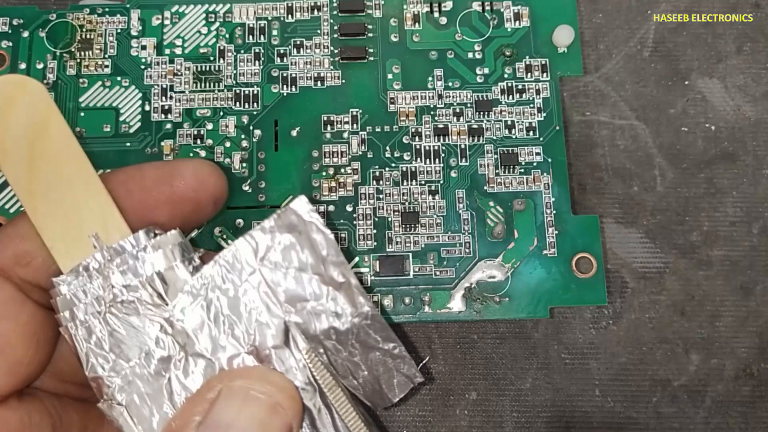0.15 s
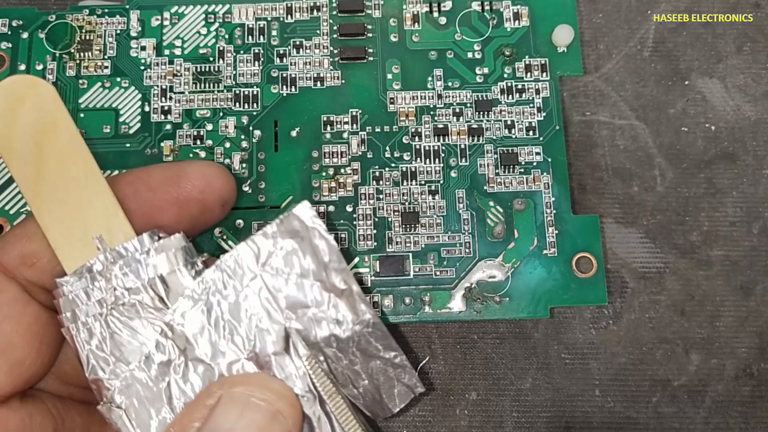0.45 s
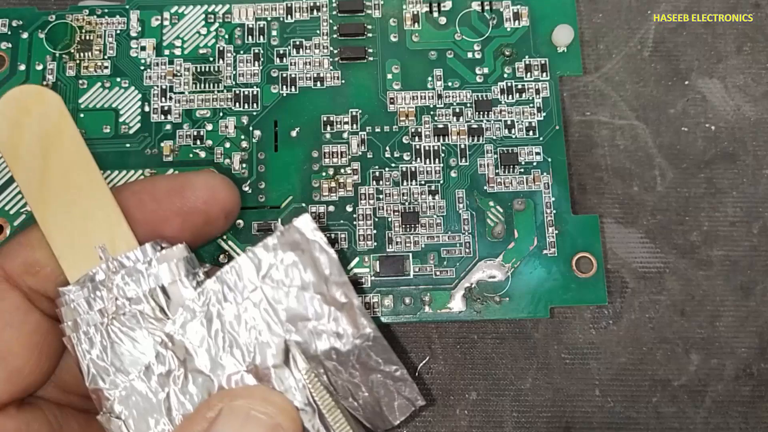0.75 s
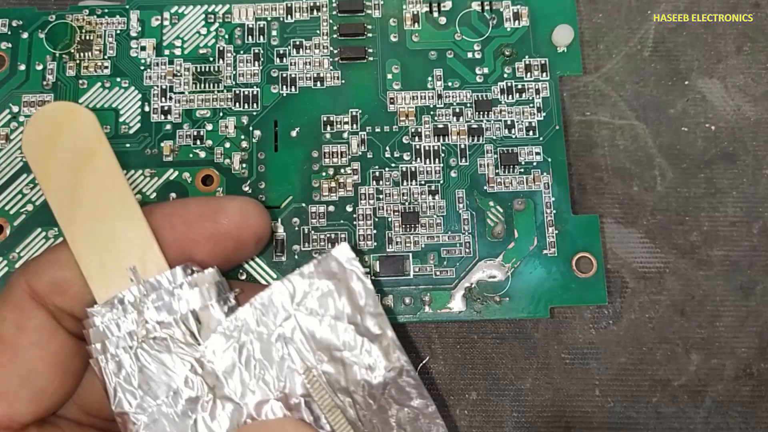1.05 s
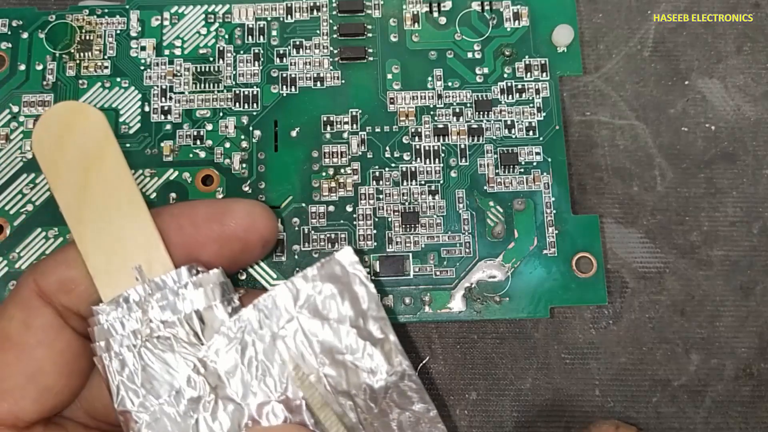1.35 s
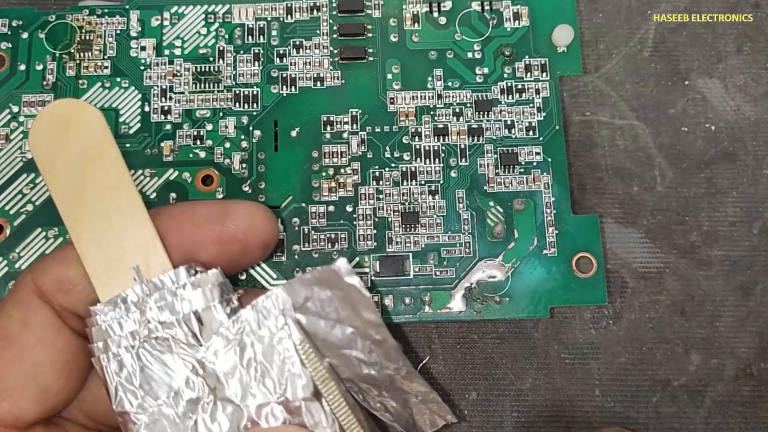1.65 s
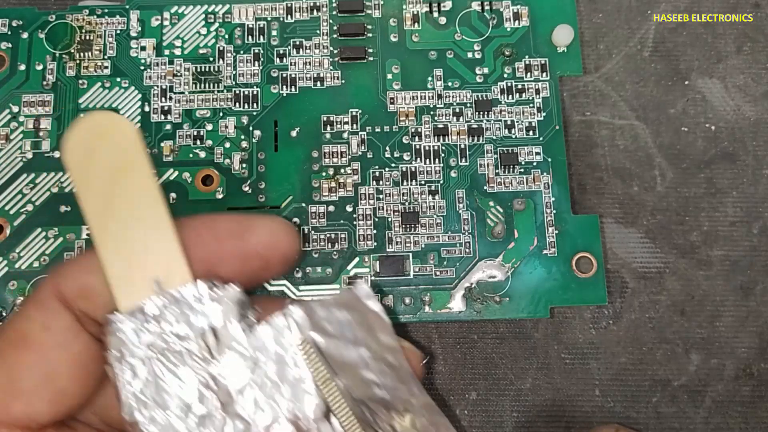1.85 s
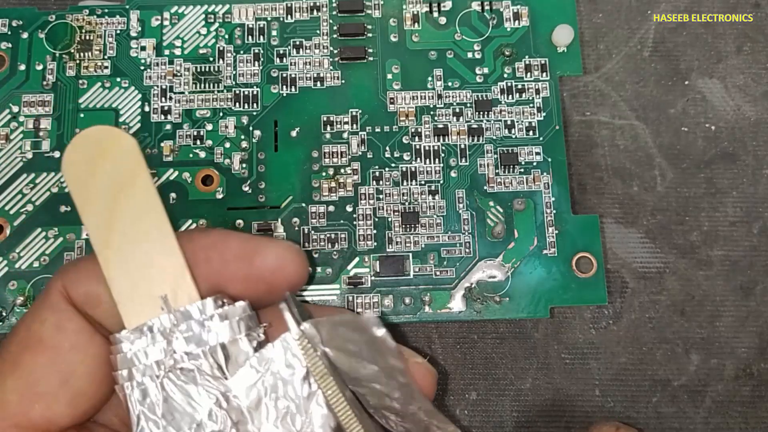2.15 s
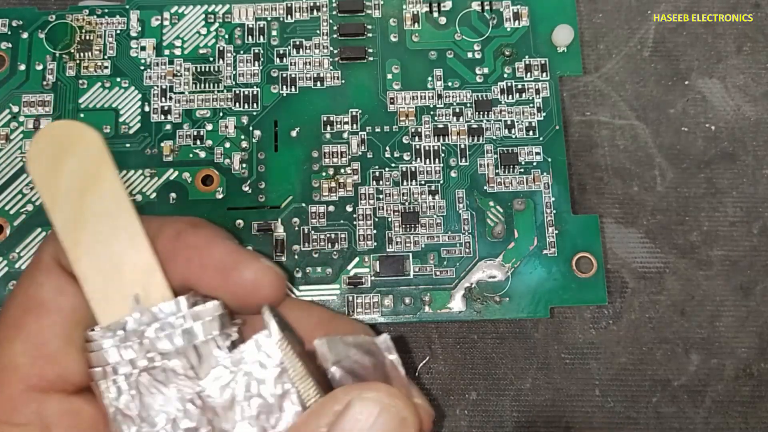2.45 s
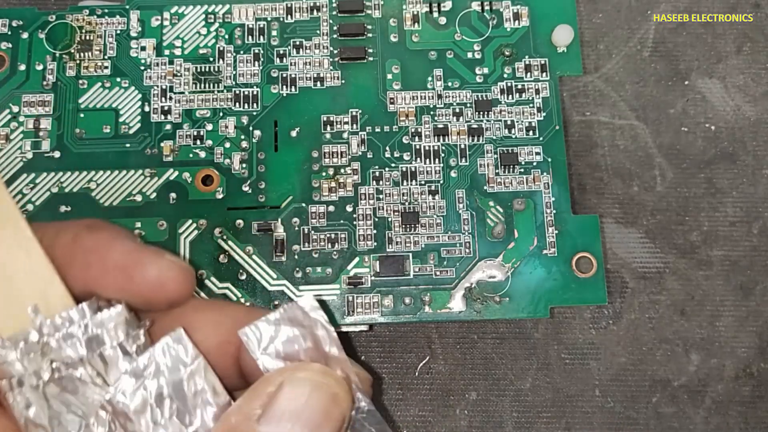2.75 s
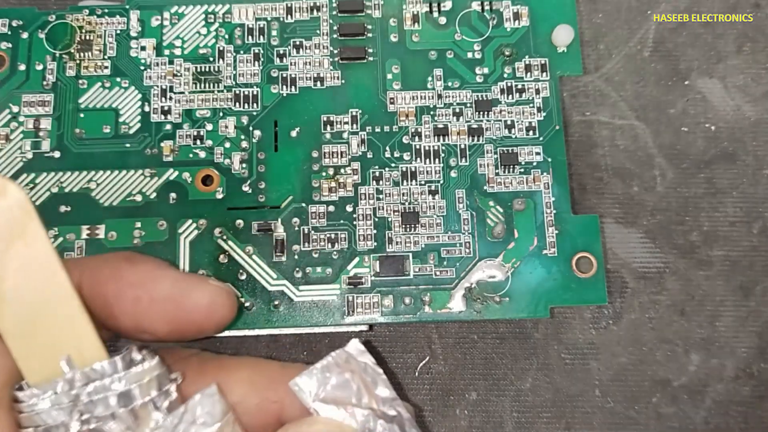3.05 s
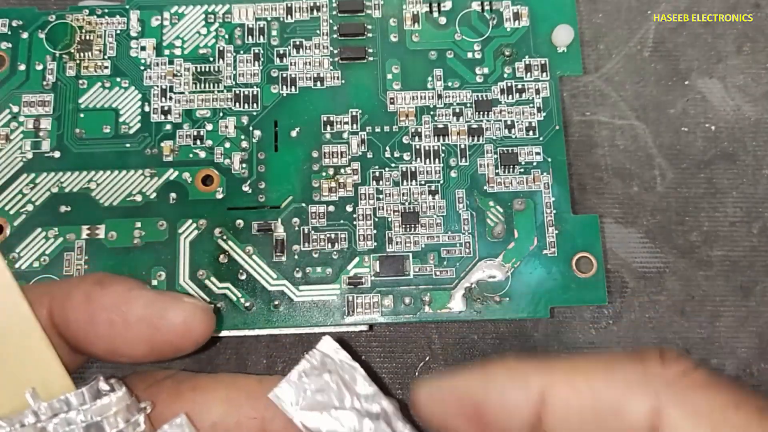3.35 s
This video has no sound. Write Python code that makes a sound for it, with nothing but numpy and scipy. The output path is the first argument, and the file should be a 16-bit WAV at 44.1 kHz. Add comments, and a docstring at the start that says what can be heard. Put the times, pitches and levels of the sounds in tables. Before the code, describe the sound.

Foil is crumpled close by with sharp irregular crackles, a bench thump and a brief metallic clatter.

```python
"""Workbench in a small, faintly humming room: aluminium foil tape is worked by hand with a small steel tool, close by.
Snaps are noise bursts with an after-ring, rustles are showers of tiny slips, loose flaps ring at wavering pitches.
The tool scrapes out of the foil, something bumps the bench and the tool clatters down: bursts plus damped modes.
Fingers then press the tape: a few more snaps, and band noise as one smooths it. A diffuse noise tail is the room."""
import sys
import numpy as np
from scipy import signal
from scipy.fft import rfft, irfft, next_fast_len
from scipy.io import wavfile
from scipy.ndimage import uniform_filter1d, map_coordinates

SR = 44100
rng = np.random.default_rng(int(sys.argv[2]) if len(sys.argv) > 2 else 0)


def put_to_file(sound):
    """Save the sound as 16-bit audio at rate SR, in the file named by the first command-line argument."""
    columns = np.atleast_2d(sound).T  # one column per channel
    safe = np.clip(columns, -1, 1)
    whole_steps = np.round(safe * 32767)
    wavfile.write(sys.argv[1], SR, whole_steps.astype(np.int16))


N = 154350

# left-right likeness of the diffuse sound: (frequency [Hz], likeness [0-1])
AIR_LIKENESS = [(100, 0.89), (400, 0.64), (1500, 0.037), (8000, 0.048)]
# bench top modes: (frequency [Hz], level [dB], t60 [s])
BENCH_MODES = [(127, -10, 0.19), (164.4, -5, 0.27), (231, -5, 0.08), (265, -4, 0.2), (298, -4.5, 0.17),
               (362, 2, .26), (400, 1, 0.17), (419, 0, 0.17), (477, -4.5, 0.15), (521, -9, 0.2),
               (658, -13, 0.24), (815, -11, .2)]
# foil spectrum: (frequency [Hz], level [dB])
FOIL_SPECTRUM = [(60, -50), (200, -10.5), (450, -7), (1000, 2.5), (1450, -0.5), (2000, -3), (3000, -1),
                 (4300, 0.5), (5700, -3), (7300, 6), (9000, -1.5), (10500, -3.5), (15000, 2.5)]

FOIL_LAG_S, BENCH_LAG_S = 0.00009, 0.00037  # left ear of the recorder lags
FOIL_SPREAD, BENCH_PAN_DB = 0.68, -4  # pan: left over right
BENCH_DB = -16  # bench ring re the blow
SPIKE_DB = -5.5  # first jolt of a crack re the burst that follows


def amp(db):
    """Decibels to gain."""
    return 10 ** (np.asarray(db) / 20)


def unit(x):
    """Scale to rms 1."""
    return x / np.sqrt(np.mean(x ** 2) + 1e-20)


def along(points, hz):
    """Interpolate (Hz, value) points on a log frequency axis."""
    f, v = np.transpose(points)
    return np.interp(np.log(hz + 1), np.log(f), v)


def fade(t, t60):
    """Exponential decay, 60 dB in t60 seconds."""
    return np.exp(-np.log(1000) * t / max(t60, 1e-4))


def wander(knots, position):
    """Smooth random curve through the knots, one knot per unit of position."""
    return map_coordinates(knots, [position], mode="mirror")


def pan_gain(pan_db):
    """Left and right gains for a left-over-right level difference."""
    return amp([[pan_db / 2], [-pan_db / 2]])


def add(out, s, x):
    """Mix x in at time s."""
    i = max(round(s * SR), 0)
    out[:, i:i + x.shape[-1]] += x[..., :max(N - i, 0)]


def tone(base, body_db, clang_db, air_db):
    """A material's spectrum, tilted for one contact."""
    tilt = [(1000, body_db), (2500, clang_db), (5500, 0), (8000, 0), (12000, air_db)]
    return lambda hz: along(base, hz) + along(tilt, hz)


def radiate(pair, colour, lag_s, pan_db, spread, size=8192):
    """Two excitations become a stereo sound with a causal colour, the left side lagging."""
    m = next_fast_len(pair.shape[1] // 2 + size // 2) * 2
    hz = np.fft.rfftfreq(m, 1 / SR)
    z = rfft(pair, m)
    smooth_power = np.abs(uniform_filter1d(np.abs(z) ** 2, len(hz) // 20, axis=1)) + 1e-12
    # minimum phase: fold the cepstrum of the wanted gain onto positive time
    cepstrum = irfft(np.log(amp(colour(hz)) / np.sqrt(smooth_power)), m)
    cepstrum[:, 1:m // 2] *= 2
    cepstrum[:, m // 2 + 1:] = 0
    a, b = z * np.exp(rfft(cepstrum))
    side = spread * b * hz / (hz + 250)  # the bass reaches both sides alike
    ears = np.array([a + side, a - side])
    ears[0] *= np.exp(-2j * np.pi * hz * lag_s)
    return irfft(ears, m) * pan_gain(pan_db)


def crack(colour, t60, lag_s, pan_db, spread, ring_db, spike_db):
    """A jolt, a sharp burst and a short dense after-ring, rms 1 over the blow."""
    attack_s, sheet_t60_s, blow_s = 0.00026, 0.087, 0.004
    t = np.arange(SR // 8) / SR
    decay = fade(t, t60) + amp(ring_db) * fade(t, sheet_t60_s)
    x = rng.standard_normal((2, len(t))) * decay * (1 - np.exp(-t / attack_s))
    x[0, round(attack_s * SR)] += amp(spike_db) * np.linalg.norm(x[0])
    x = radiate(x, colour, lag_s, pan_db, spread)
    return x / np.sqrt(np.mean(x[:, :round(blow_s * SR)] ** 2))


def ring(modes, lag_s, pan_db):
    """Damped modes of alternating sign, each struck a little harder or softer every time."""
    t = np.maximum(np.arange(SR // 2) / SR - np.array([[lag_s], [0]]), 0)
    x = np.zeros_like(t)
    for k, (hz, db, t60) in enumerate(modes):
        strength = (-1) ** k * amp(db + rng.normal())
        x += strength * fade(t, t60) * np.sin(2 * np.pi * hz * t)
    return x * pan_gain(pan_db)


def room_noise():
    """Steady low rush plus hum partials whose phases drift."""
    # rush spectrum: (frequency [Hz], relative level [dB])
    rush_spectrum = [(25, -11), (45, 0), (65, -6), (140, -1), (250, -1), (370, -4), (470, -9), (800, -7.5),
                     (1300, -14), (2000, -18), (3500, -22.5), (5500, -26.5), (7400, -25), (10000, -31),
                     (15500, -27.5)]
    # hum partials: (frequency [Hz], level [dB])
    hum_partials = [(66, -61), (97, -61), (143, -61.5), (197, -69)]
    rush_db, drift_rad, drift_per_s = -51.5, 0.73, 10
    hz, t = np.fft.rfftfreq(N, 1 / SR), np.arange(N) / SR
    turn = np.arccos(np.clip(along(AIR_LIKENESS, hz), -1, 1)) / 2
    noise = rfft(rng.standard_normal((2, N))) * amp(along(rush_spectrum, hz))
    mid, side = irfft(noise * [np.cos(turn), np.sin(turn)], N)
    rush = amp(rush_db) * unit(np.array([mid + side, mid - side]))
    hum = np.zeros(N)
    for f, db in hum_partials:
        drift = drift_rad * wander(rng.standard_normal(64), t * drift_per_s)
        hum += amp(db) * np.sqrt(2) * np.sin(2 * np.pi * f * t + drift)
    return (rush + hum) * pan_gain(-1.8)


def room(x):
    """A short diffuse tail of decaying noise, most alike on both sides in the bass."""
    # reverberation: (frequency [Hz], t60 [s])
    room_t60 = [(150, 0.45), (1000, 0.5), (4000, 0.57), (8000, 0.51), (15000, 0.45)]
    # tail spectrum: (frequency [Hz], level [dB])
    room_colour = [(150, -10), (1000, -9.5), (3000, -9), (7500, -11), (15000, -14)]
    build_up_s = 0.0042
    hz, t, z = signal.stft(rng.standard_normal((2, SR)), SR, nperseg=256)
    alike = np.clip(along(AIR_LIKENESS, hz), 0, 1)[:, None]
    z[1] = alike * z[0] + np.sqrt(1 - alike ** 2) * z[1]
    decay = np.exp(-np.log(1000) * t / np.maximum(along(room_t60, hz), 0.02)[:, None])
    energy_norm = np.sqrt(SR * np.mean(decay ** 2, axis=1, keepdims=True))
    gain = amp(along(room_colour, hz))[:, None] / energy_norm
    tail = signal.istft(z * decay * gain, SR, nperseg=256)[1]
    tail *= 1 - np.exp(-np.arange(tail.shape[1]) / SR / build_up_s)
    return signal.fftconvolve(x, tail, axes=1)[:, :N]


def bench_bumps():
    """Soft blows: a dull burst, and the bench top's modes ring."""
    # blows: (time [s], level [dB])
    bumps = [(1.184, -31.5), (2.468, -10.5)]
    # bump spectrum: (frequency [Hz], level [dB])
    bump_spectrum = [(25, -25), (60, -10.5), (130, -9.5), (290, 3.5), (620, -6), (1030, 6.5), (1350, -8.5),
                     (1700, -13), (2700, -10.5), (3500, -25.5), (7000, -29), (15000, -51)]
    bump_t60_s, bump_ring_db = 0.014, -5
    out = np.zeros((2, N))
    for s, db in bumps:
        thump = crack(lambda hz: along(bump_spectrum, hz), bump_t60_s, lag_s=0.0002,
                      pan_db=BENCH_PAN_DB, spread=0.58, ring_db=-22, spike_db=5)
        add(out, s, amp(db) * thump)
        add(out, s, amp(db + BENCH_DB + bump_ring_db) * ring(BENCH_MODES, BENCH_LAG_S, BENCH_PAN_DB))
    return out


def bench_knocks():
    """Hollow knocks: one damped bench mode each."""
    # knocks: (time [s], pitch [Hz], level [dB])
    thuds = [(1.185, 473, -36.5), (2.491, 205, -25), (2.571, 138, -26), (2.622, 363, -26.5)]
    thud_t60_s = 0.06
    out = np.zeros((2, N))
    for s, hz, db in thuds:
        add(out, s, amp(db) * ring([(hz, 0, thud_t60_s)], BENCH_LAG_S, BENCH_PAN_DB))
    return out


def tool_clatter():
    """The steel tool lands, rocks and bounces; each hit rings the modes of bench and tool."""
    # hits: (time [s], level [dB], body at 1 kHz [dB], clang at 2.5 kHz [dB], air at 12 kHz [dB],
    #        t60 [s], left over right [dB])
    hits = [(2.5341, -15.5, 20.3, 14, 2.5, 0.048, -1.5), (2.5699, -22, 9.9, 8.8, -29, 0.0085, -6),
            (2.5851, -11.5, 1.8, 2.5, -6.5, 0.024, 0), (2.599, -24, 9.4, 9.5, -14, .05, -4.5),
            (2.6367, -22, 12.8, 7.3, -9, 0.032, 0.5)]
    # steel spectrum: (frequency [Hz], level [dB])
    steel_spectrum = [(25, -10), (70, -8.5), (380, 5), (650, -4), (1300, 1), (2500, -6.5), (4200, -3),
                      (6000, -8), (8000, -6), (11000, -10.5), (15500, -9)]
    # tool modes: (frequency [Hz], level [dB], t60 [s])
    tool_modes = [(1192, -3, .15), (1332, -4, .28), (1447, -5, .28), (4188, -9, .15), (7490, -5, .17),
                  (8127, 0, 0.14), (11280, -4, 0.1), (11735, -5, .13)]
    tool_db = -22  # tool ring re the hit
    out = np.zeros((2, N))
    for s, db, body, clang, air, t60, pan in hits:
        colour = tone(steel_spectrum, body, clang, air)
        hit = crack(colour, t60, BENCH_LAG_S, pan, spread=0.67, ring_db=-26, spike_db=SPIKE_DB)
        add(out, s, amp(db) * hit)
        add(out, s, amp(db + BENCH_DB) * ring(BENCH_MODES, BENCH_LAG_S, BENCH_PAN_DB))
        add(out, s, amp(db + tool_db) * ring(tool_modes, BENCH_LAG_S, pan))
    return out


def smoothing():
    """A finger smooths the tape: steady friction sings softly in two resonances of the taut tape."""
    # one pass: (start [s], end [s], level [dB])
    start, end, db = (3.16, 3.5, -53.5)
    # tape resonances: (frequency [Hz], width [Hz], level [dB])
    tape_resonances = [(950, 120, -2), (1710, 300, -1.5)]
    hz, t = np.fft.rfftfreq(N, 1 / SR), np.arange(N) / SR
    body = sum(amp(level) / (1 + ((hz - f) / width * 2) ** 2) for f, width, level in tape_resonances)
    a, b = irfft(rfft(rng.standard_normal((2, N))) * body, N)
    force = np.clip(np.minimum(t - start, end - t) / 0.01, 0, 1)  # 10 ms ramps
    return amp(db) * force * unit(np.array([a + FOIL_SPREAD * b, a - FOIL_SPREAD * b]))


def foil_flaps():
    """A freed flap of foil rings briefly at one wavering pitch until the fingers damp it."""
    # flaps: (time [s], pitch [Hz], level [dB], t60 [s])
    flaps = [(.528, 1960, -20, 0.026), (.537, 929, -29.5, 0.053), (.628, 1190, -25, 0.014),
             (0.6342, 1310, -27.5, 0.02), (.675, 822, -39, 0.046), (0.876, 1290, -29.5, 0.011),
             (1.0674, 1660, -44.5, 0.052), (1.5238, 2420, -31, 0.016), (2.267, 1095, -22, 0.027),
             (2.294, 2090, -30, 0.039), (2.304, 1946, -24, 0.041), (3.147, 1932, -26.5, 0.033),
             (3.452, 1050, -36, 0.021)]
    pitch_wander, wander_per_s = 0.025, 300  # relative
    rise_over_t60 = 0.016
    out, t = np.zeros((2, N)), np.arange(SR // 8) / SR
    for s, hz, db, t60 in flaps:
        waver = pitch_wander * wander(rng.standard_normal(64), t * wander_per_s)
        phase = 2 * np.pi * hz * (np.cumsum(1 + waver) / SR - np.array([[FOIL_LAG_S], [0]]))
        envelope = (1 - np.exp(-t / (rise_over_t60 * t60))) * fade(t, t60)
        add(out, s, amp(db) * np.sqrt(2) * envelope * np.sin(phase))
    return out


def shifting(x):
    """The sheet's resonances come and go as it bends: a random gain field over frequency and time."""
    depth_db, spacing_hz, life_s = 3.5, 469, 0.0226
    hz, t, z = signal.stft(x, SR, nperseg=256)
    grid = np.meshgrid(hz / spacing_hz, t / life_s, indexing="ij")
    field = map_coordinates(rng.standard_normal((96, 96)), grid, mode="mirror")
    return signal.istft(z * amp(depth_db * field), SR, nperseg=256)[1]


def foil_rustle():
    """Thousands of tiny slips a second excite the sheet while it is rubbed or bent."""
    # strokes: (start [s], rise [s], hold [s], fall [s], level [dB],
    #           body at 1 kHz [dB], clang at 2.5 kHz [dB], air at 12 kHz [dB])
    strokes = [(0.509, 0.013, 0.018, 0.033, -30, 5, 11, -3),
               (0.799, 0.067, 0.013, 0.054, -41.5, 12.5, 10, -8),
               (1.054, 0.014, 0.012, 0.098, -43, 3, 10.5, -10), (1.139, 0.039, 0.0085, 0.16, -42, 5, 6, -6),
               (1.513, 0.028, 0.062, 0.021, -35.5, 2, 3.5, -2.5),
               (1.875, 0.045, 0.66, 0.081, -50, 1, 7.5, -0.5),
               (2.041, 0.028, 0.0043, 0.016, -36, -3, -3, -5),
               (2.168, 0.075, 0.036, 0.017, -31.5, 2, 7.5, -5),
               (2.243, 0.019, 0.0073, 0.0053, -22, -1.5, 3, -8),
               (2.251, 0.035, 0.038, 0.01, -27, -7, 0.5, 1.5),
               (2.35, 0.079, 0.056, 0.082, -41.5, 4, 6.5, -10), (2.54, 0.054, 0.039, 0.062, -35, 9, 16, -6),
               (2.681, 0.033, 0.54, 0.33, -54, 11, 6, -11.5),
               (3.109, 0.0088, 0.15, 0.21, -47, -0.5, 5, -4.5), (3.283, 0.029, 0.1, 0.15, -43, -5, 0, -3),
               (3.446, 0.029, 0.014, 0.054, -43.5, -11, 5, -9)]
    slips_per_s, slip_spread_db = 6000, 3
    range_db, pan_db = 22, -1
    flutter_db, flutter_per_s = 2.1, 150  # the rubbing catches and lets go
    out = np.zeros((2, N))
    for s, rise, hold, fall, db, body, clang, air in strokes:
        n = round((rise + hold + fall) * SR)
        t = np.arange(n) / SR
        slip_sizes = (rng.random(n) < slips_per_s / SR) * amp(slip_spread_db * rng.standard_normal(n))
        slips = slip_sizes * rng.standard_normal((2, n))
        rubbed = radiate(slips, tone(FOIL_SPECTRUM, body, clang, air), FOIL_LAG_S, pan_db, FOIL_SPREAD)
        rubbed = unit(shifting(rubbed)[:, :n])
        force_db = np.interp(t, np.cumsum([0, rise, hold, fall]), [-range_db, 0, 0, -range_db])
        catch_db = flutter_db * wander(rng.standard_normal(256), t * flutter_per_s)
        add(out, s, amp(db + force_db + catch_db) * rubbed)
    return out


def crumpled(colour):
    """Add the chance resonances of the sheet's present shape to a spectrum."""
    depth_db, spacing_hz = 4.5, 279
    knots = rng.standard_normal(256)
    return lambda hz: colour(hz) + depth_db * wander(knots, hz / spacing_hz) * hz / (hz + 500)


def foil_snaps():
    """Each crease buckles at once and shakes the sheet."""
    # creases: (time [s], level [dB], body at 1 kHz [dB], clang at 2.5 kHz [dB], air at 12 kHz [dB],
    #           t60 [s], left over right [dB])
    creases = [(0.5222, -16, -42, -6, -1.5, 0.0032, 0.5), (0.5273, -30.5, -2, 17, -15, 0.028, 11),
               (0.5372, -23.5, 7.5, 12, -12, 0.033, -4), (0.582, -37, 13, 13, -10, 0.075, 0),
               (0.628, -32, -5, 3, -11, 0.025, -1), (0.633, -33.5, 20, 18, 0, 0.014, -4),
               (0.6357, -31, 11, 6.5, -14, 0.015, -4.5), (0.874, -40.5, 5, 13, -16, 0.05, 1),
               (1.079, -36.5, -1, 16, 3.5, 0.031, -2), (1.184, -30.5, 15, 16, -4, 0.016, -2.5),
               (1.277, -39.5, -12, -4, -7, 0.027, -0.5), (1.523, -34.5, 7, 16, 0, 0.017, -6),
               (1.839, -25.5, 4.5, 0, 0, 0.049, -2), (1.9254, -31, -4, 7.5, -3.5, 0.028, -2),
               (1.9692, -24.5, 1.5, -2, -5.5, 0.028, 1), (2.186, -35.5, -1, -22, -2, 0.035, 1),
               (2.267, -19, -4, 3.5, -25, 0.014, -1), (3.044, -33.5, 5.5, 9, -5, 0.032, -4.5),
               (3.095, -31.5, 6, -3, -5, 0.019, -4), (3.147, -25, -30, -6, -18, 0.0068, -2),
               (3.149, -34, 12, 4, 0, 0.014, -13), (3.153, -24, 5, 7, -0.5, 0.013, -2.5)]
    sheet_db = -28  # after-ring re the burst
    out = np.zeros((2, N))
    for s, db, body, clang, air, t60, pan in creases:
        colour = crumpled(tone(FOIL_SPECTRUM, body, clang, air))
        snap = crack(colour, t60, FOIL_LAG_S, pan, FOIL_SPREAD, sheet_db, SPIKE_DB)
        add(out, s, amp(db) * snap)
    return out


def scene():
    """Foil and bench sounds, the room's answer and its noise."""
    foil = foil_snaps() + foil_flaps() + foil_rustle() + smoothing()
    near = foil + bench_bumps() + bench_knocks() + tool_clatter()
    return near + room(near) + room_noise()


def record(dry):
    """The microphone loses the deep bass; the recorder clips at full scale, then cuts above its band limit."""
    mic_low_hz, top_hz = 57, 15850
    thin = signal.sosfilt(signal.butter(3, mic_low_hz, "highpass", fs=SR, output="sos"), dry)
    m = next_fast_len(N + SR // 2)
    low_pass = 1 / (1 + (np.fft.rfftfreq(m, 1 / SR) / top_hz) ** 200)
    return irfft(rfft(np.clip(thin, -1, 1), m) * low_pass, m)[:, :N]


dry = scene()
out = record(dry)
put_to_file(out)
```